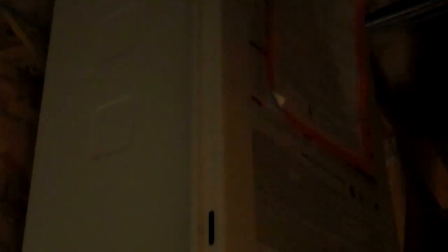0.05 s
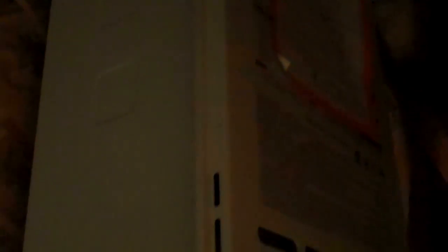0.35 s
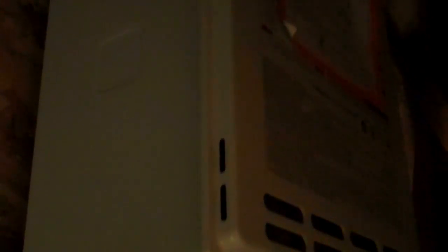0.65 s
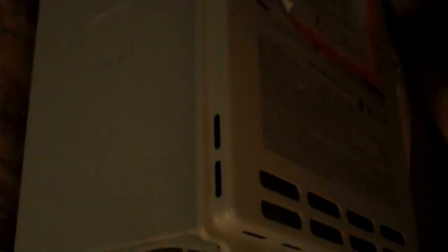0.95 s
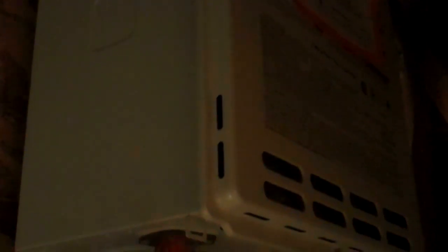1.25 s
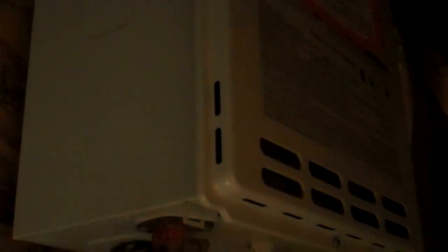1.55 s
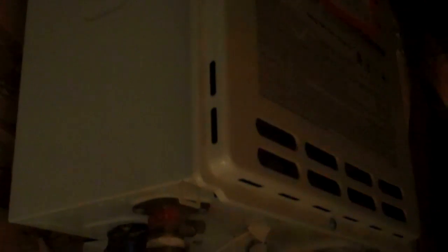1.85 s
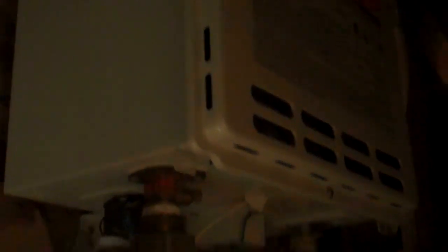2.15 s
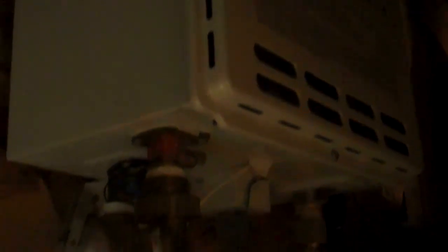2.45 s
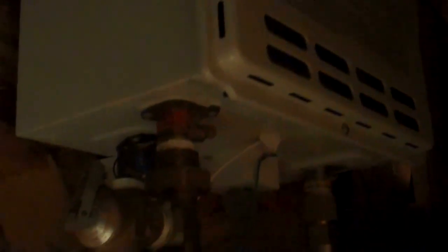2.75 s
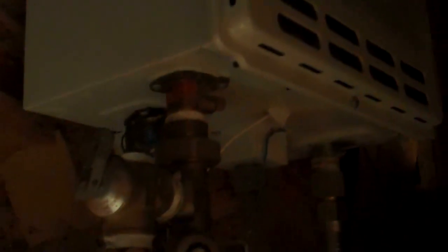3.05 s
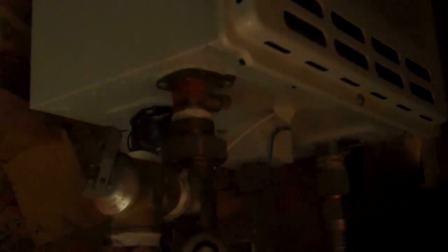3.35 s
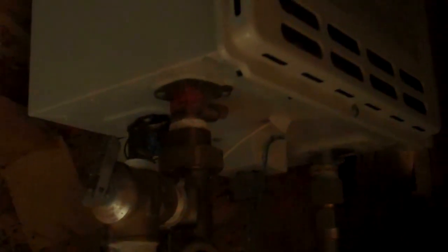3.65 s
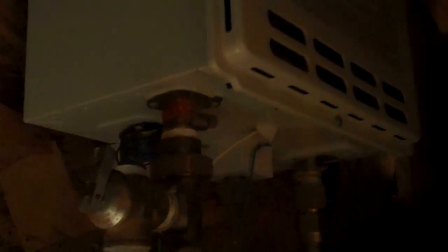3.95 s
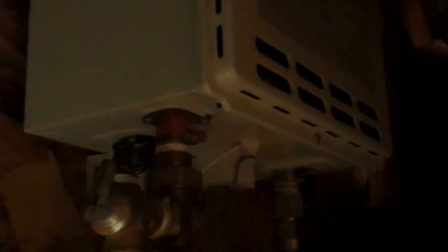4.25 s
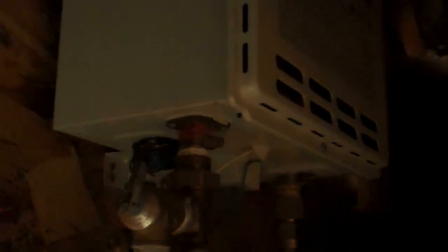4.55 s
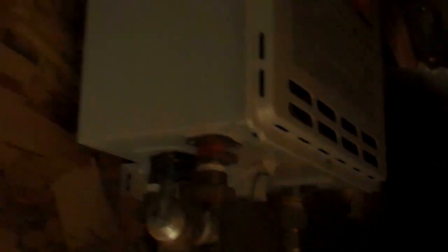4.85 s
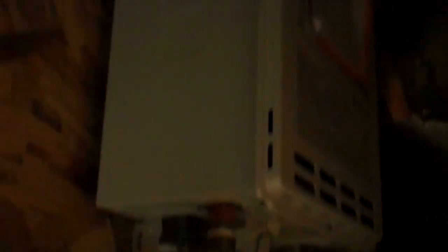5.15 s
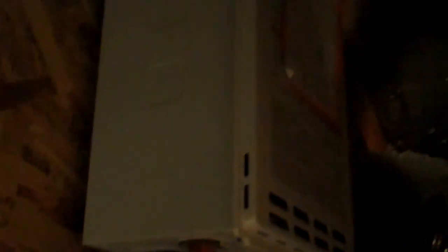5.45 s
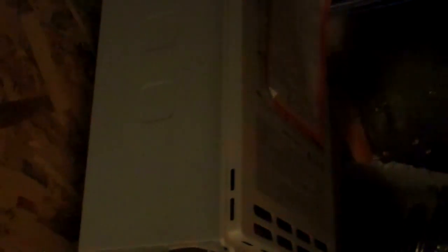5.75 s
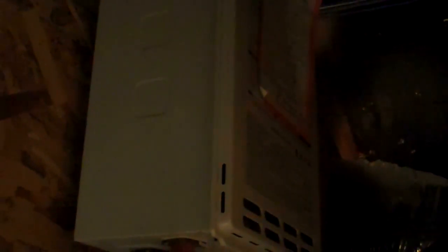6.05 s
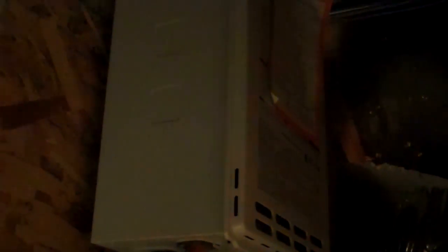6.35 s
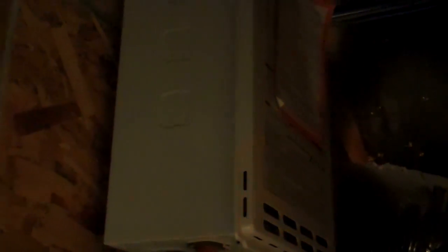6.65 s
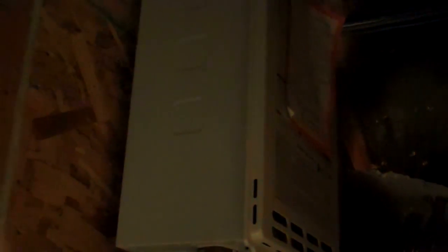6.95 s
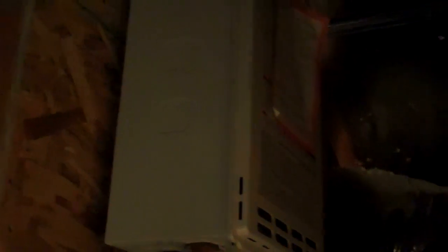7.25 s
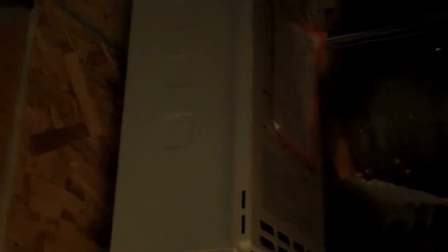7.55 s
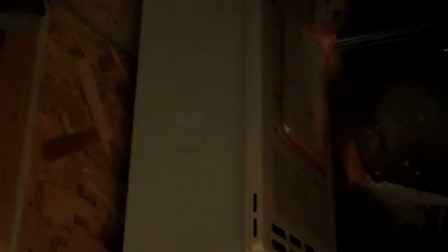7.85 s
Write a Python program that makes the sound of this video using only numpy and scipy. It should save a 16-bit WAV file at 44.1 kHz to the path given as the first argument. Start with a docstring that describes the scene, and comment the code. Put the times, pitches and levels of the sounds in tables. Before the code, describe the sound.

Low pump hum in a small utility space, repeatedly surging with rattling, hissing water; a single metallic click comes near the end.

```python
"""A small utility space, where a gas water heater is fed by what is most likely a water pump.
The pump's periodic strokes, about 66 a second, give a harmonic hum and modulate the noise of the flow.
Seven times it labours: it sags in speed and knocks roughly, water spurts through resonant pipes,
and a valve pings on each stroke. After the longest surge something in the heater snaps with one
sharp click, an impact that rings briefly."""
import sys
import numpy as np
from scipy import signal
from scipy.fft import rfft, irfft, next_fast_len
from scipy.io import wavfile
from scipy.ndimage import uniform_filter1d

SR = 44100
rng = np.random.default_rng(int(sys.argv[2]) if len(sys.argv) > 2 else 0)


def persist_wave(psi):
    """Save psi, clipped to +-1, as 16-bit WAV."""
    counts = np.round(np.clip(psi, -1, 1) * 32767).astype(np.int16)
    wavfile.write(sys.argv[1], SR, np.atleast_2d(counts).T)


N = 353241
TIME = np.arange(N) / SR

# noise spectra of the room air and the water: (frequency [Hz], relative spectral density [dB])
AIR_SPECTRUM = [(20, 9), (60, 3), (100, 4), (300, 3), (550, 2), (800, -14), (1150, -13), (1600, -8),
                (2250, -17), (3600, -12), (8000, -2), (14000, -12)]
CALM_SPECTRUM = [(300, -4), (450, -11.5), (550, 4.5), (680, -3), (1000, -5), (1500, -5.5), (2200, 0),
                 (2600, -12), (3100, -12.5), (3800, -15), (7000, -38)]
RUMBLE_SPECTRUM = [(35, -41), (70, -14), (95, -16.5), (120, -16), (143, -4), (168, 3.5), (200, 0.5),
                   (265, -16), (345, 0), (410, -6.5), (470, -4.5), (600, -13.5), (900, -11.5)]
CHURN_SPECTRUM = [(300, -23), (480, -10.5), (560, 4), (700, -8), (950, -3.5), (1400, -5.5), (2100, -1.5),
                  (2600, -8), (3200, -8.5), (4200, -13.5), (7000, -25)]
SPRAY_SPECTRUM = [(2000, -18), (3000, 4.5), (4200, -2.5), (5300, -0.5), (6800, -2.5), (8000, -0.5),
                  (9000, -3.5), (10300, 0), (12000, -4.5), (14000, -12.5)]
# early reflections from the near walls: (delay [s], gain [ratio])
WALL_ECHOES = [(.00073, 0.28), (.00207, 0.035), (.0034, -0.36), (.0052, 0.21), (.0079, -0.16),
               (.0117, 0.26)]
# listening point: (time [s], position [0 beside the casing, 1 below it near the pipes])
LISTENER_PATH = [(0, 0), (1.8, 0.86), (2.8, 0.96), (4.3, 0.96), (4.9, 0), (8.01, 0.63)]
# resonances of the quiet flow: (frequency [Hz], bandwidth [Hz], gain beside [dB], gain below [dB])
HOLLOW_MODES = [(554, 110, -0.5, -13), (804, 70, -20, -4), (874, 65, -25, 8), (1156, 75, 7.5, -4.5),
                (1440, 19, -32, -37), (1990, 140, -50, -7), (2230, 110, -10.5, -21), (3300, 160, -1, -6)]
# resonances of pipes and casing: (frequency [Hz], bandwidth [Hz], relative gain [dB])
CASING_MODES = [(481, 25, 15.5), (554, 27, 0), (708, 53, 8), (828, 46, 9.5), (1020, 12, -8),
                (1155, 110, -8.5), (1226, 14, 9.5), (1493, 86, 1), (1799, 19, 12), (1988, 16, -20.5),
                (2140, 45, -1.5), (2580, 24, 6), (3480, 140, -5), (4712, 79, 10), (5210, 130, -2.5),
                (5800, 140, -2), (6200, 110, 4), (7420, 50, 8.5), (8920, 62, 11), (9460, 44, 6),
                (10700, 40, -7), (12540, 72, -4)]
# the click's sharp release and duller landing: (time [s], ring level [dB], crack level [dB])
CLICK_CONTACTS = [(6.9895, -39, -39.5), (6.9914, -26, -43)]
# modes that the click excites: (frequency [Hz], relative level [dB], 60 dB decay time [s])
CATCH_MODES = [(1177, -10, .05), (1400, -16, .03), (1705, -9.5, 0.015), (1890, 2, 0.014), (2090, -4, .03),
               (2370, -5, .035), (2600, -19, 0.045), (3430, -16, 0.032), (4100, -28, .03),
               (4296, -19, 0.025), (5450, -24, 0.023), (7400, -18, 0.018)]
# spells of heavy load on the pump: (start [s], end [s], base ping level relative to the spray [dB])
PUMP_SURGES = [(0.116, 0.364, -11), (1.325, 1.595, -9.5), (2.185, 2.485, -11.5), (3.135, 3.42, -8),
               (4.405, 4.68, -10), (5.773, 6.772, -6), (7.649, 7.937, -7.5)]
# gushes: (time [s], base half width [s], spray level [dB], churn level [dB], knock level [dB])
WATER_GUSHES = [(0.158, 0.026, -38, -34, -47.5), (0.267, 0.024, -34.0, -27.5, -32),
                (0.402, 0.0093, -52.5, -40, -46), (1.365, 0.018, -38.0, -31.5, -46),
                (1.481, 0.029, -34.5, -28.5, -33), (1.568, 0.013, -45, -37.5, -49.5),
                (1.614, 0.032, -52, -41.5, -45), (2.231, 0.017, -36.5, -31, -42),
                (2.293, 0.01, -41, -46, -44.5), (2.346, 0.024, -33.5, -28.5, -32),
                (2.42, 0.038, -44.0, -35.5, -42), (3.177, 0.02, -35, -31.5, -41.5),
                (3.293, 0.026, -32, -26.5, -31.5), (3.402, 0.024, -52, -41.5, -44),
                (4.451, 0.02, -36.5, -31.5, -45.5), (4.564, 0.027, -35, -28, -33.5),
                (4.684, 0.009, -58, -42.5, -47.5), (5.632, 0.0091, -58.5, -45, -58),
                (5.812, 0.018, -38.5, -33, -46), (5.935, 0.035, -39, -33, -36.5),
                (6.073, 0.035, -37.5, -32.5, -48), (6.218, 0.034, -36.5, -31.5, -40.5),
                (6.328, 0.033, -36.5, -32.5, -44), (6.481, 0.047, -38, -34, -42),
                (6.617, 0.043, -38.5, -34, -46), (6.724, 0.03, -39.5, -36, -43),
                (7.687, 0.018, -44.5, -36, -49), (7.81, 0.033, -40.0, -36.5, -37.5),
                (7.911, 0.022, -48.0, -43.5, -45)]
# base level of the free-running hum, creeping up with pressure between surges: (time [s], level [dB])
IDLE_LEVEL = [(0, -47), (.5, -57.5), (1.15, -52.5), (1.8, -53.5), (2.05, -52), (2.65, -55), (3, -51.5),
              (3.55, -56), (4.25, -49.5), (4.85, -61), (5.15, -57.5), (5.5, -59.5), (7.0, -66.5),
              (7.3, -61), (8, -60)]
# base speed of the unloaded pump: (time [s], stroke rate [Hz])
FREE_STROKE_RATE = [(0, 65.3), (5.7, 65.6), (6.9, 66.4)]
# harmonics of the stroke rate, at relative levels:
# (harmonic [number], free level [dB], growth [dB per dB of pressure], loaded level [dB])
PUMP_HARMONICS = [(2, -10.5, 0, -0.1), (3, 0, 0.56, -1.5), (4, -16, 0.6, -4), (5, -11.5, 1.28, -2),
                  (6, -12, -1, -6), (7, -8, 0.5, -4.5), (8, -8.5, -0.65, -4.5), (9, -10, -0.5, -6),
                  (10, -9, 0, -9.5), (11, -11, 0.5, -8.5), (12, -8, 0.5, -24), (13, -7.5, 0.42, -21),
                  (14, -12.5, -0.5, -8.5), (15, -18.5, -2.5, -11), (16, -13, -0.4, -14.5),
                  (17, -9.5, 0.44, -16)]


def from_db(db):
    """Amplitude grows tenfold for every 20 dB."""
    return 10 ** (np.asarray(db) / 20)


def unit_rms(x):
    """Normalisation to unit mean power."""
    return x / np.sqrt(np.mean(x ** 2) + 1e-20)


def curves(rows):
    """Linear interpolation of each column of a time table at every sample."""
    times, *columns = np.transpose(rows)
    return [np.interp(TIME, times, column) for column in columns]


def noise(spectrum):
    """Spectral shaping of white noise, falling 12 dB an octave beyond the table's ends; rms 1."""
    size = next_fast_len(N)
    bins_hz = np.maximum(np.fft.rfftfreq(size, 1 / SR), 1)
    hz, db = np.transpose(spectrum)
    colour = from_db(np.interp(np.log(bins_hz), np.log(hz), db))
    skirts = np.minimum(bins_hz / hz[0], 1) * np.minimum(hz[-1] / bins_hz, 1)
    return unit_rms(irfft(rfft(rng.standard_normal(size)) * colour * skirts ** 2, size)[:N])


def drift(rate_hz):
    """Slow random modulation: straight lines join values drawn at the given rate; rms 1."""
    knots = rng.standard_normal(N // 10)
    return unit_rms(np.interp(TIME * rate_hz, np.arange(len(knots)), knots))


def resonate(x, hz, width_hz):
    """Forced response of a single resonance with unit peak gain."""
    radius = np.exp(-np.pi * width_hz / SR)
    feedback = [1, -2 * radius * np.cos(2 * np.pi * hz / SR), radius ** 2]
    return signal.lfilter(np.array([1, 0, -1]) * (1 - radius ** 2) / 2, feedback, x)


def ring(x, hz, t60):
    """Free vibration of a damped mode: a unit impulse starts a decaying sine of height 1."""
    radius, angle = 10 ** (-3 / (t60 * SR)), 2 * np.pi * hz / SR
    return signal.lfilter([0, np.sin(angle)], [1, -2 * radius * np.cos(angle), radius ** 2], x + 1e-18)


def room_air(level_db=-64):
    """Ambient noise: the still room gives a steady broadband floor."""
    return from_db(level_db) * noise(AIR_SPECTRUM)


def walls(x):
    """Early reflection: close walls add delayed copies to the direct sound."""
    return x + sum(gain * np.interp(TIME - delay, TIME, x, left=0) for delay, gain in WALL_ECHOES)


def casing(x, ring_db):
    """Resonance: pipes and sheet metal reinforce their natural frequencies; rms 1."""
    tones = sum(from_db(db) * resonate(x, hz, width) for hz, width, db in CASING_MODES)
    return unit_rms(x + from_db(ring_db) * tones)


def spurts(strokes, decay_cycles, base, uneven_db):
    """Amplitude modulation: each stroke adds a decaying spurt of random strength to a base flow."""
    strength = from_db(uneven_db * rng.standard_normal(N // 100)[strokes.astype(int)])
    return unit_rms(base + strength * np.exp(-(strokes % 1) / decay_cycles))


def calm_flow(strokes):
    """Resonances make quiet flow sound hollow; their balance depends on the listening point."""
    (below,) = curves(LISTENER_PATH)
    flow = noise(CALM_SPECTRUM) * spurts(strokes, decay_cycles=0.96, base=2.0, uneven_db=3.0)
    tones = sum(from_db(beside_db + (below_db - beside_db) * below) * resonate(flow, hz, width)
                for hz, width, beside_db, below_db in HOLLOW_MODES)
    return unit_rms(flow + tones)


def water(strokes, load, roughness, knock_db, churn_db, spray_db):
    """Pulsating flow: each stroke drives rumble, churning and spray through the pipes."""
    rumble = noise(RUMBLE_SPECTRUM) * spurts(strokes, decay_cycles=0.41, base=1.4, uneven_db=1.0)
    churn = noise(CHURN_SPECTRUM) * spurts(strokes, decay_cycles=0.63, base=1.0, uneven_db=1.2)
    spray = noise(SPRAY_SPECTRUM)
    spray *= spurts(strokes, decay_cycles=0.83, base=0.63, uneven_db=1.2 + 2.1 * load)
    flow = np.sqrt(load) * casing(churn, ring_db=-1.5) + np.sqrt(1 - load) * calm_flow(strokes)
    rush = from_db(churn_db) * flow + from_db(spray_db) * casing(spray, ring_db=-1.0)
    return roughness * from_db(knock_db) * rumble + walls(rush)


def pipe_whistle(level_db, hz=2735, width_hz=48):
    """Narrow-band resonance: noise excites a faint pipe tone."""
    tone = resonate(resonate(rng.standard_normal(N), hz, width_hz), hz, 2 * width_hz)
    return from_db(level_db) * unit_rms(tone)


def valve(strokes, level_db, hz=9690, width_hz=230, uneven_db=5.5):
    """Impulse excitation: the valve seats once a stroke and gives a short, very high ping."""
    impacts = np.diff(np.floor(strokes), prepend=0) * from_db(uneven_db * rng.standard_normal(N))
    return from_db(level_db) * unit_rms(resonate(resonate(impacts, hz, width_hz), hz, width_hz))


def click(crack_decay_s=0.0084, low_cut_hz=1050):
    """Impact: a catch lets go and lands, giving a dry crack and a brief ring of metal modes."""
    impacts, crack = np.zeros(N), np.zeros(N)
    for at_s, ring_db, crack_db in CLICK_CONTACTS:
        impacts[round(at_s * SR)] = from_db(ring_db)
        crack += from_db(crack_db) * (TIME >= at_s) * np.exp(-np.abs(TIME - at_s) / crack_decay_s)
    crack *= noise([(1000, 7), (2000, 12.5), (4500, 2), (8000, -6), (14000, -14)])
    ringing = sum((-1) ** k * from_db(db) * ring(impacts, hz, t60)
                  for k, (hz, db, t60) in enumerate(CATCH_MODES))
    high_pass = signal.butter(4, low_cut_hz, "high", fs=SR, output="sos")
    return walls(signal.sosfilt(high_pass, ringing + crack))


def surge_power(hold_db, rise_db_per_s, fall_db_per_s):
    """Exponential growth and decay: power builds before each surge, holds, then dies away."""
    return sum(from_db(hold_db - rise_db_per_s * np.maximum(start - TIME, 0)
                       - fall_db_per_s * np.maximum(TIME - end, 0)) ** 2
               for start, end, _ in PUMP_SURGES)


def gush_power(at_s, width_s, peak_db):
    """A squared hyperbolic secant gives one gush a rounded top and exponential flanks."""
    power = np.zeros(N)
    near = np.abs(TIME - at_s) < 8 * width_s
    power[near] = (from_db(peak_db) / np.cosh((TIME[near] - at_s) / width_s)) ** 2
    return power


def flow_levels(idle_reference_db=-53, knock_lead_s=0.042):
    """Addition of powers: idle flow, surges and gushes set the knock, churn and spray levels in dB."""
    (idle_db,) = curves(IDLE_LEVEL)
    pressure_db = idle_db - idle_reference_db
    knock = from_db(idle_db) ** 2
    churn = from_db(-50.5 + 0.51 * pressure_db) ** 2   # quiet flow follows part of the hum's swing
    spray = from_db(-59 + 0.42 * pressure_db) ** 2
    knock += surge_power(hold_db=-50, rise_db_per_s=38, fall_db_per_s=109)
    churn += surge_power(hold_db=-44.5, rise_db_per_s=46, fall_db_per_s=91)
    spray += surge_power(hold_db=-55.5, rise_db_per_s=74, fall_db_per_s=195)
    for at_s, width_s, spray_db, churn_db, knock_db in WATER_GUSHES:
        knock += gush_power(at_s - knock_lead_s, 2.48 * width_s, knock_db)
        churn += gush_power(at_s, 1.17 * width_s, churn_db)
        spray += gush_power(at_s, width_s, spray_db)
    return 10 * np.log10([knock, churn, spray])


def pump_load(on_s, off_s):
    """A trapezoidal envelope: 0 while the pump runs free, 1 during a surge."""
    return sum(np.clip((TIME - start) / on_s + .5, 0, 1) * np.clip((end - TIME) / off_s + .5, 0, 1)
               for start, end, _ in PUMP_SURGES)


def pressure_build_db(peak_db=9, width_s=0.17):
    """Extra pressure rises exponentially to the start of each surge and relaxes after it."""
    return sum(peak_db * np.exp(-np.abs(TIME - start) / width_s) for start, _, _ in PUMP_SURGES)


def settling(early=0.88, late=0.41, after_s=0.29, over_s=0.059, ping_db_per_s=5):
    """Transient to steady state: as a surge lasts, its roughness falls and the ping level grows."""
    age_s, ping_db = curves([point for start, end, db in PUMP_SURGES
                             for point in ((start, 0, db), (end, end - start, db))])
    settled = .5 + .5 * np.tanh((age_s - after_s) / over_s)
    return early + (late - early) * settled, ping_db + ping_db_per_s * age_s


def stroke_rate(gush_db, loaded_hz=59.7, sag_hz_per_db=0.39, overshoot_hz=1.8, overshoot_s=.12):
    """Mechanical loading: surges and gushes slow the pump, which recovers with a slight overshoot."""
    (free_hz,) = curves(FREE_STROKE_RATE)
    free_hz += sum(overshoot_hz * np.exp(-np.abs(TIME - end) / overshoot_s) for _, end, _ in PUMP_SURGES)
    return free_hz + (loaded_hz - free_hz) * pump_load(on_s=.05, off_s=.07) - sag_hz_per_db * gush_db


def pump_fundamental(rate_hz, load, knock_db, gush_db, free_db=-55.5, loaded_db=-2.0, flutter_db=1.5,
                     sag_hz_per_db=0.8, dip_lag_s=.018):
    """The lowest partial follows the knocking, swells before a surge, and sags and dips at each gush."""
    cycles = np.cumsum(rate_hz - sag_hz_per_db * gush_db + 0.88 * drift(11)) / SR
    level_db = free_db + 0.48 * (knock_db - np.median(knock_db)) + 0.42 * pressure_build_db()
    level_db += load * (loaded_db + flutter_db * drift(30))
    level_db -= 0.62 * np.interp(TIME - dip_lag_s, TIME, gush_db)
    return np.sqrt(2) * from_db(level_db) * np.cos(2 * np.pi * cycles)


def pump_hum(strokes, load, roughness, knock_db, calm_db=-49, beside_db=-1):
    """Periodic strokes give a harmonic series; the pulse sharpens with pressure and roughens under load."""
    pressure_db = np.clip(np.minimum(knock_db - calm_db, 4) + pressure_build_db(), -4, 11)
    flutter = 0.12 + 0.43 * roughness
    (below,) = curves(LISTENER_PATH)
    tones, power = 0, 0
    for k, free_db, growth, loaded_db in PUMP_HARMONICS:
        gain = from_db((1 - load) * (free_db + growth * pressure_db) + load * loaded_db)
        if k < 8:   # the low harmonics set the overall level
            power += gain ** 2 / 2
        if k == 3:   # the main tone is weaker beside the casing
            gain *= from_db(beside_db * (0.5 - below) * (1 - load))
        phase = 2 * np.pi * k * strokes + .15 * k * rng.standard_normal()   # high ones arrive scattered
        wobble = flutter * np.sqrt(k / 3)
        wave = (1 + wobble * drift(22)) * np.cos(phase) + wobble * drift(22) * np.sin(phase)
        tones += gain * wave / np.sqrt(1 + 2 * wobble ** 2)
    return from_db(knock_db) * tones / np.sqrt(power)


def scene():
    """Superposition: pump, water and valve share one stroke rhythm; the click and room air are added."""
    knock_db, churn_db, spray_db = flow_levels()
    load = pump_load(on_s=.07, off_s=.14)
    loaded_roughness, ping_db = settling()
    roughness = np.clip(0.15 * (1 - load) + load * loaded_roughness, 0, .95)   # chaotic part of the knock
    gush_db = load * (spray_db - uniform_filter1d(spray_db, size=SR // 7))   # excess over the local mean
    rate_hz = stroke_rate(gush_db)
    strokes = np.cumsum(rate_hz * (1 + .003 * drift(25))) / SR
    hum = np.sqrt(1 - roughness ** 2) * pump_hum(strokes, load, roughness, knock_db)
    fundamental = pump_fundamental(rate_hz, load, knock_db, gush_db)
    valve_db = spray_db + ping_db - 14 * (1 - load)
    singing = valve(strokes, valve_db) + pipe_whistle(valve_db - 4.5)
    air = room_air()
    flow = water(strokes, load, roughness, knock_db, churn_db, spray_db)
    return (air + flow + singing + click() + fundamental + hum)[None]


def record(dry, cutoff_hz=13950):
    """Band limiting: a steep low-pass filter removes the highest treble."""
    return signal.sosfilt(signal.ellip(12, .1, 80, cutoff_hz, fs=SR, output="sos"), dry)


dry = scene()
out = record(dry)
persist_wave(out)
```